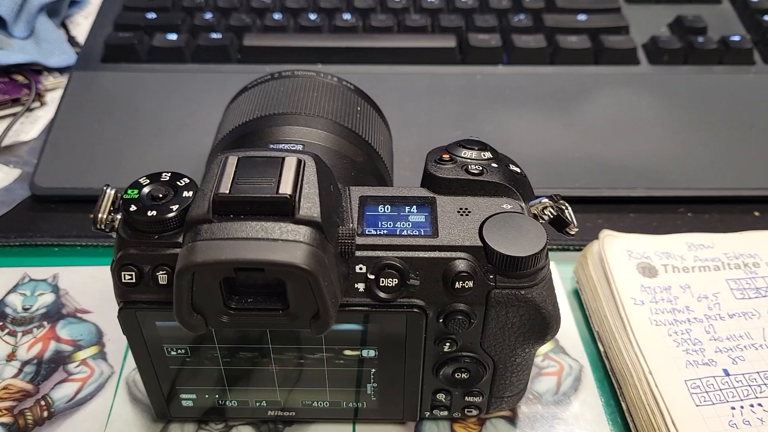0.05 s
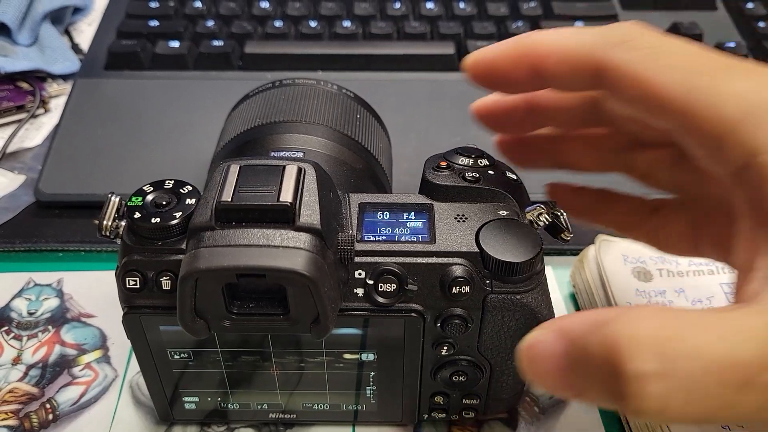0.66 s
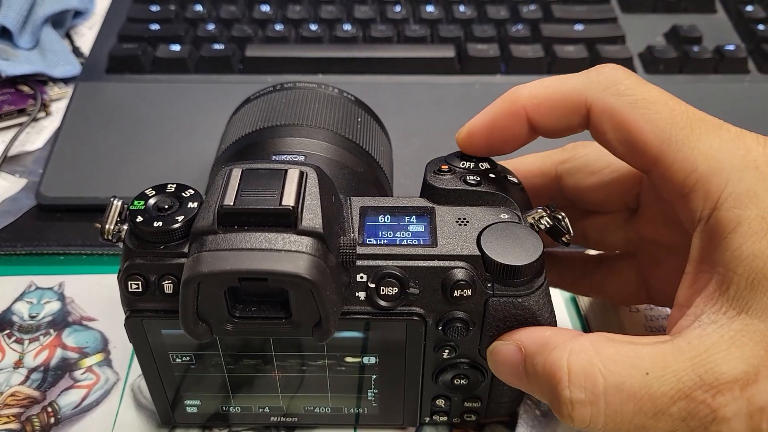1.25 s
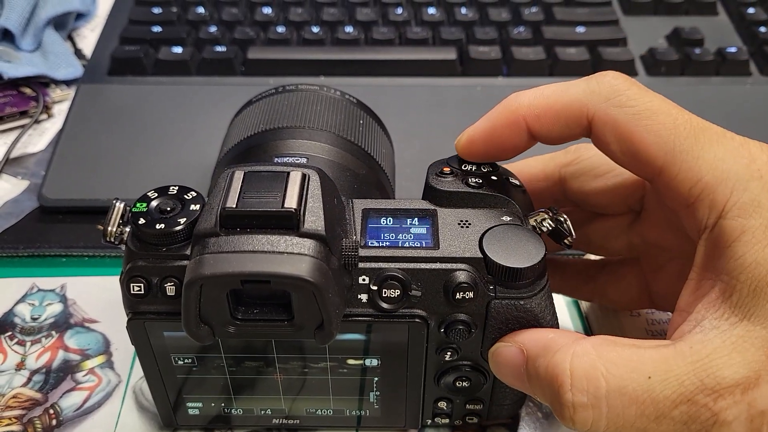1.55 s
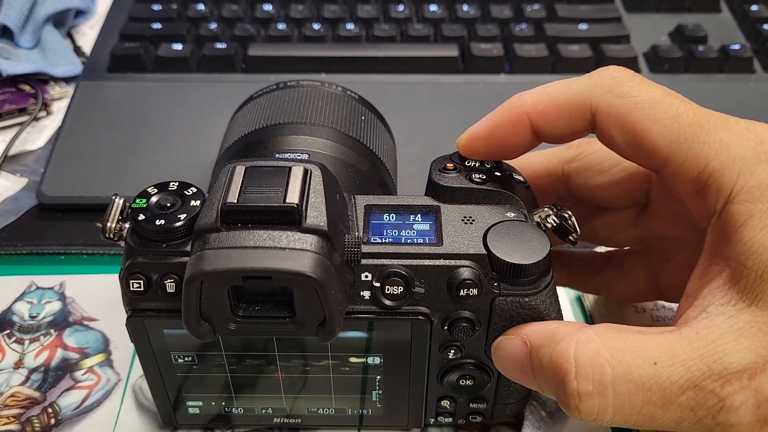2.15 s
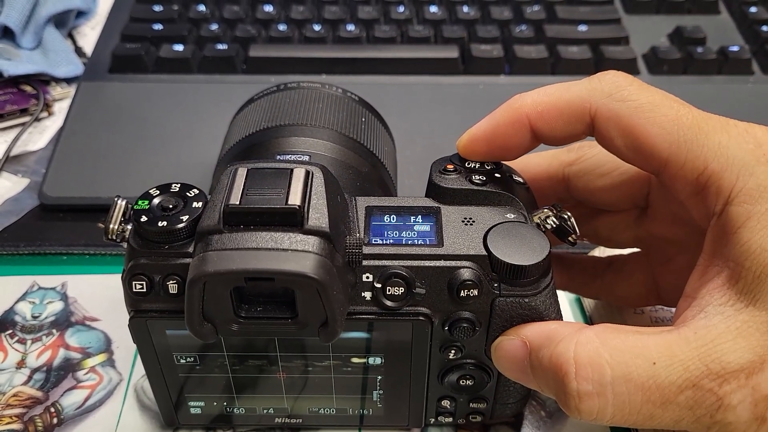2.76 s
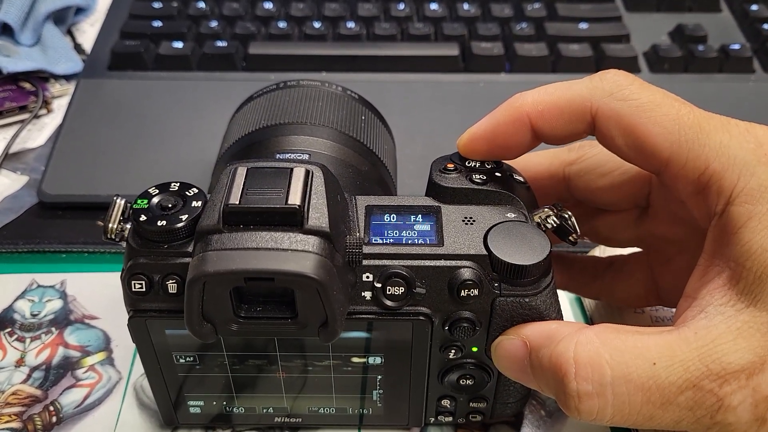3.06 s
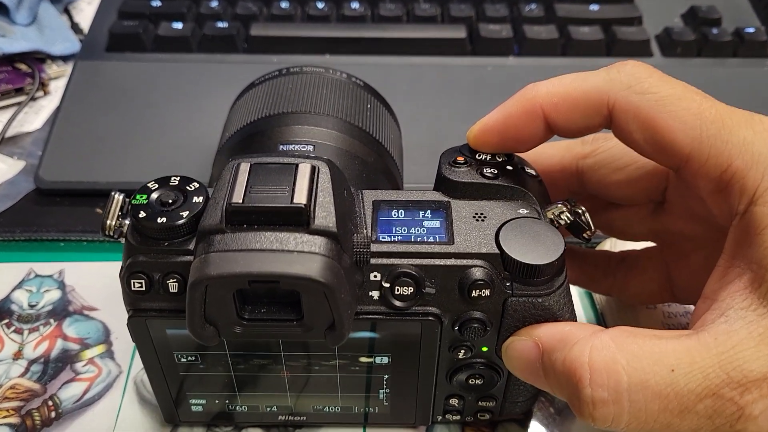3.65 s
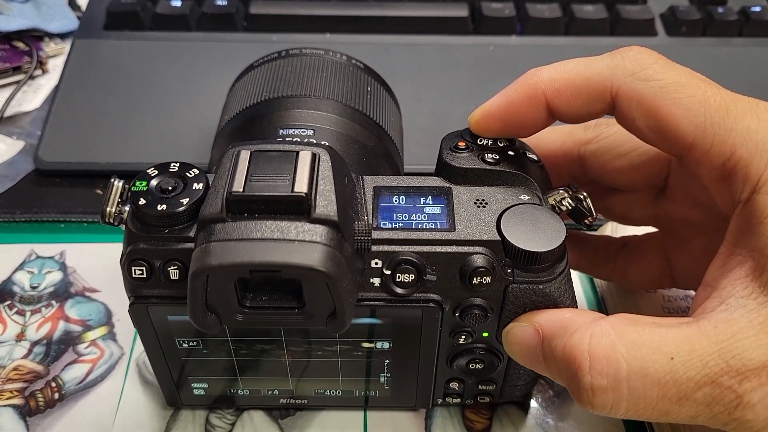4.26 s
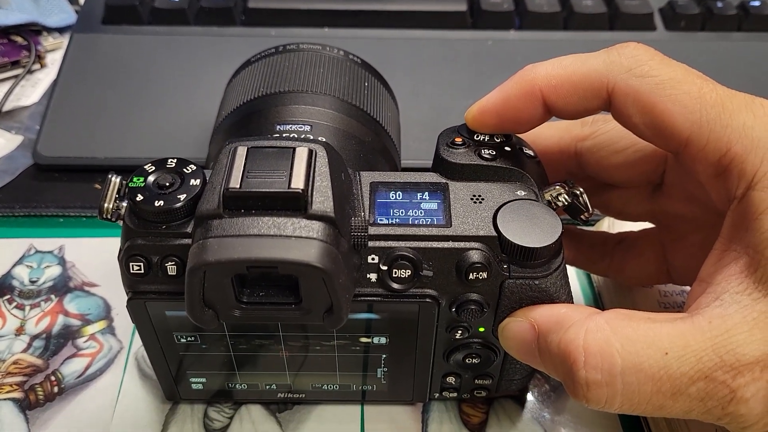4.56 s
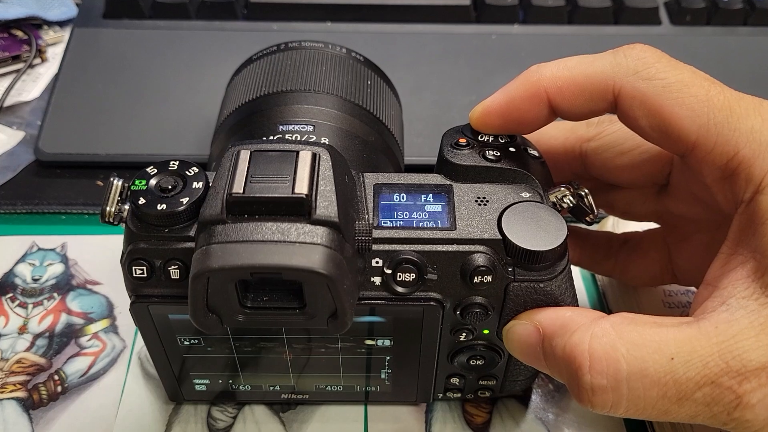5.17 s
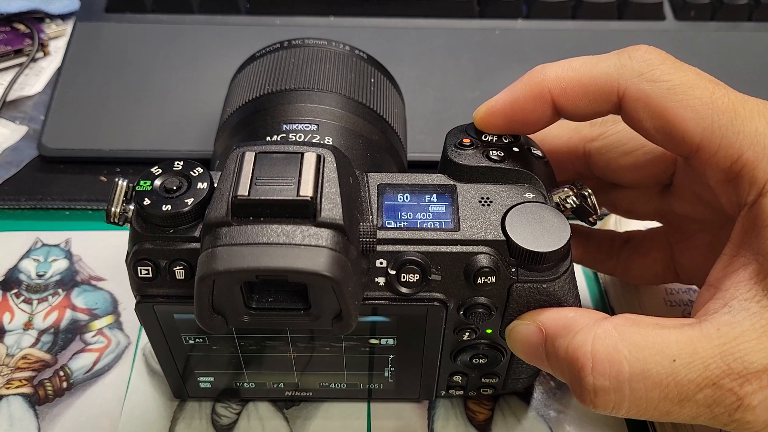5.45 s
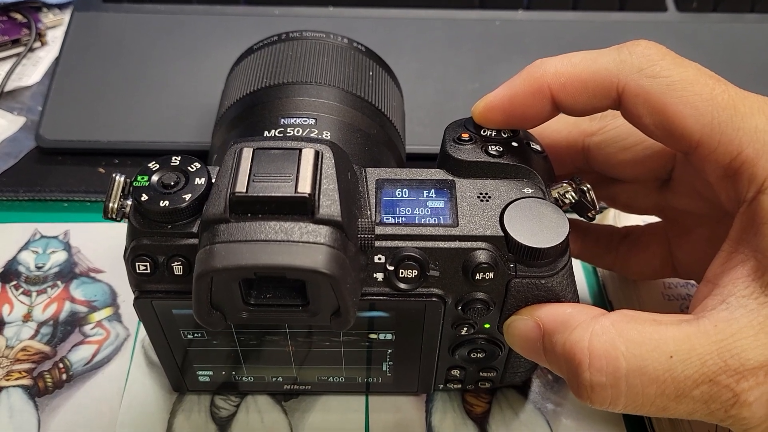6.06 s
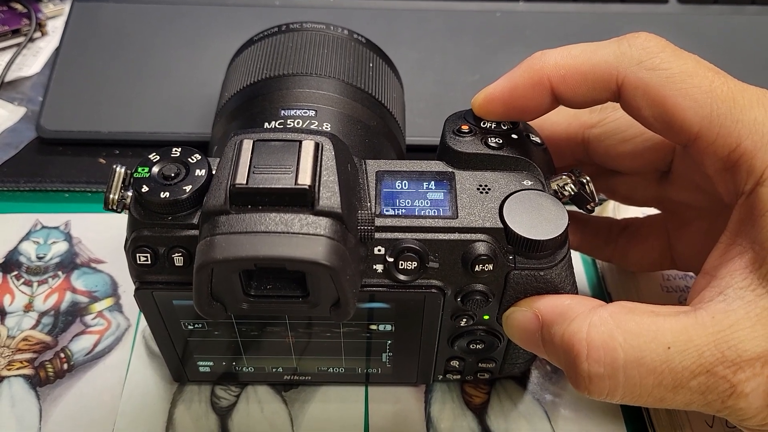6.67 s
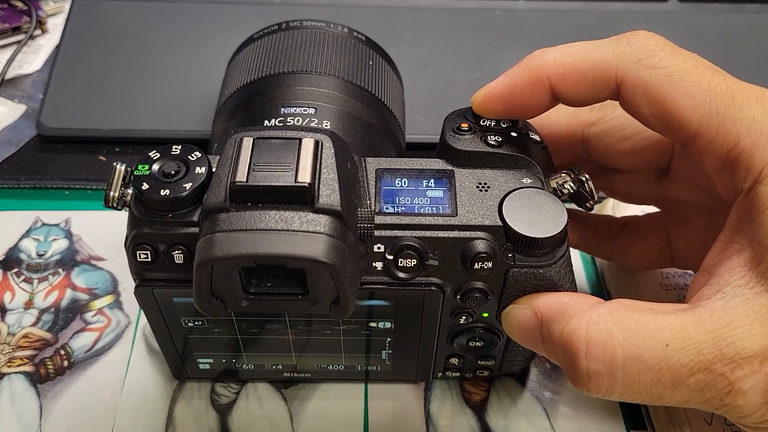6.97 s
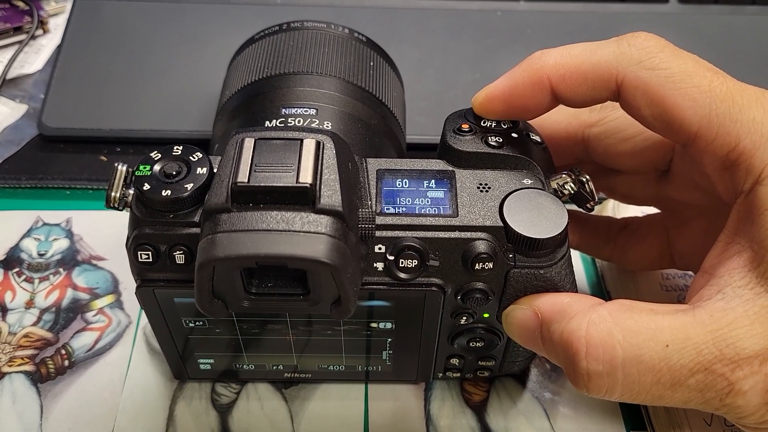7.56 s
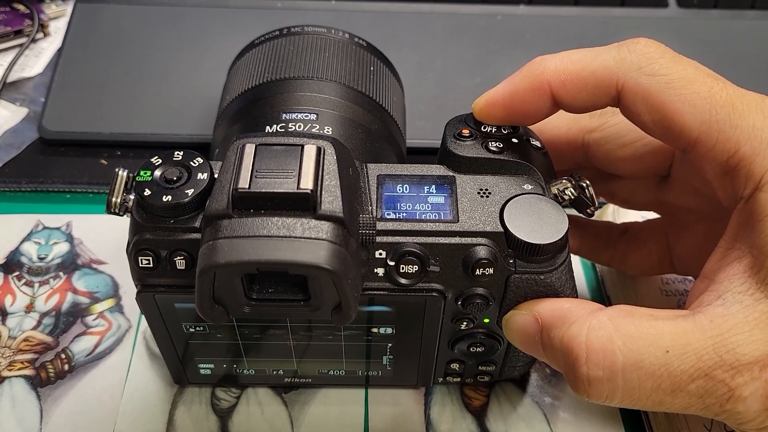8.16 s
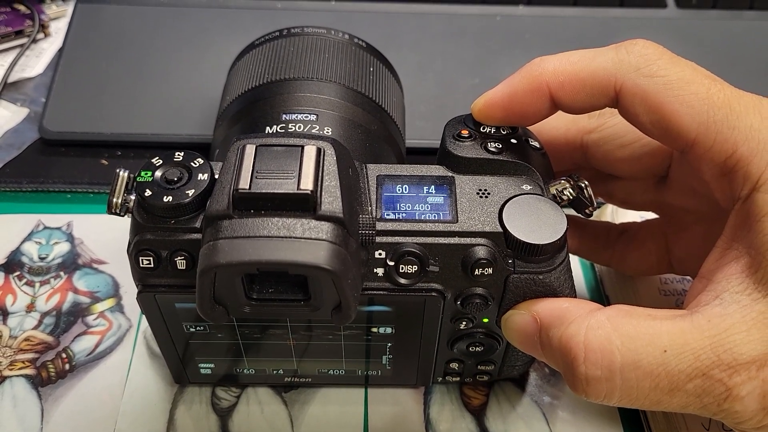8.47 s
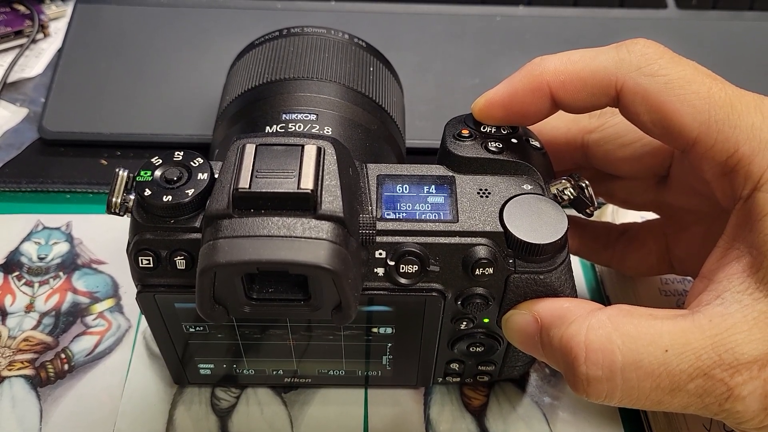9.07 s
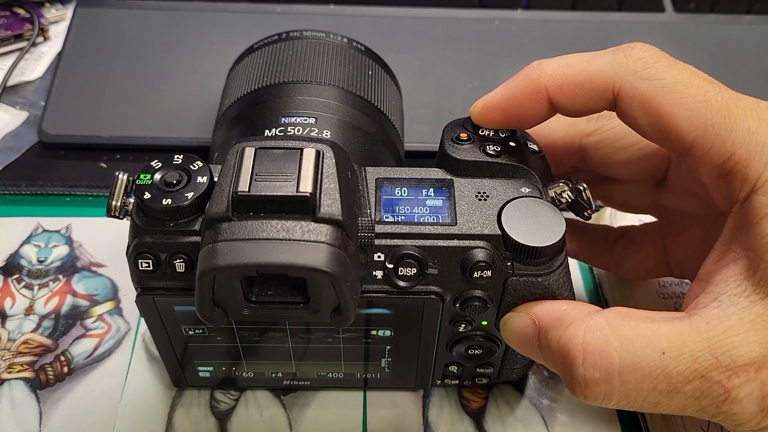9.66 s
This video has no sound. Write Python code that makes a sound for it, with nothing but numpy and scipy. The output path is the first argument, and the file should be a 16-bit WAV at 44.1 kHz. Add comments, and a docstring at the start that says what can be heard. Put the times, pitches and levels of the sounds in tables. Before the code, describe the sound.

Close up in a quiet room, soft hiss and a few muffled hand bumps lead into a camera shutter snapping rapidly, about eight shots a second. Each shot is a crisp click, a brief winding rasp and a second click, lightly thumping the desk below. After some four seconds the burst gives way to about ten slower, halting shots, their closing and opening clacks clearly apart, over a faint rumble from the gripping hand.

```python
"""A mirrorless camera's shutter fires a burst at eight frames a second, then single shots, on a desk.
In each shot a latch trips and a curtain slams shut, the motor winds it back, and a second latch and
slam reopen the shutter. The blows ring the camera body and thump the desk, close to a phone's two
microphones in a quiet room. The hand adds soft bumps, ticks and a low rumble, and the electronics
whine faintly after the burst. A soft, steady hiss lies underneath."""
import sys
import numpy as np
from scipy import signal
from scipy.fft import rfft, irfft
from scipy.io import wavfile
from scipy.ndimage import uniform_filter1d

SR = 44100
rng = np.random.default_rng(int(sys.argv[2]) if len(sys.argv) > 2 else 0)


def bounce(signal):
    """Save signal as a 16-bit WAV file at the path given by the first command-line argument."""
    frames = np.transpose(np.atleast_2d(signal))
    limited = np.clip(frames, -1, 1)
    pcm = np.round(limited * 32767).astype(np.int16)
    wavfile.write(sys.argv[1], SR, pcm)


N = 437472
SIZE = 8192  # samples in one short sound
T, HZ = np.arange(SIZE) / SR, np.fft.rfftfreq(SIZE, 1 / SR)
TIME = np.arange(N) / SR
TOP_HZ = 16100


def shutter():
    """Latch, closing slam, winding, then latch and opening slam. Returns close sound and room send."""
    # camera body resonances: pitch_hz, width_hz, closing_lift_db, opening_lift_db
    body_modes = [(746, 100, 11.5, 20.5), (876, 134, 12, 11.5), (1008, 130, 1.5, 4.5),
                  (1148, 188, 2.5, 19.5), (1300, 115, 4.5, 15.5), (1472, 197, 3, 13.5),
                  (1620, 156, -2, 10.5), (1784, 58, -3, 13.5), (1807, 37, 1, 12), (2062, 123, 5, 8),
                  (2125, 170, -3, -0.5), (2600, 150, 3.5, -3), (3239, 106, 3.5, 17.5),
                  (3240, 370, 4.5, -3.5), (3836, 176, 5, 13), (4410, 400, 3, 0.5), (4810, 620, 3, 6.5),
                  (5570, 880, 2, 7.5), (6290, 1120, 5.5, 7), (8070, 720, 2.5, 13), (8570, 285, 7.5, 7),
                  (9530, 960, 2.5, 11), (10100, 210, 1, 15), (12840, 2500, 7.5, 9.5)]
    # force spectra of the four contacts: freq_hz, level_db
    latch_eq = [(300, 3), (550, -13), (800, -6.5), (1300, -12.5), (2200, -1.5), (4000, -9.5), (7000, -19),
                (11000, -23.5), (15500, -21.5)]
    close_eq = [(300, -43), (550, -22), (800, -11), (1300, 4), (2200, 3.5), (4000, -5), (7000, -12),
                (11000, -11.5), (15500, -18.5)]
    open_eq = [(300, -20.5), (550, -8), (800, -9), (1300, -10.5), (2200, -3.5), (4000, 3.5), (7000, -11.5),
               (11000, -10.5), (15500, -15.5)]
    gear_eq = [(300, -26.5), (550, -4.5), (800, -4), (1300, 5), (2400, 0), (4000, -2), (7000, -9),
               (11000, -15), (15500, -21)]
    close_s, close_db, open_s, open_db, treble = shots()
    closing, opening = sum(np.outer(lifts, 1 / (1 + (2 * (HZ - hz) / width) ** 2))
                           for hz, width, *lifts in body_modes)
    travel_s = .0064  # the curtain's flight from latch to stop
    latch = shape([(.001, 1), (.0024, .8), (.0045, .45), (.007, .4)])
    shut = shape([(.0003, .97), (.0012, .79), (.0028, .4), (.005, .3), (.01, .08)])  # blade after blade
    snap = shape([(.0003, 1), (.0014, .89), (.0028, .45), (.005, .29), (.009, .1), (.016, .058)])
    shut_push = shape([(.002, .6), (.01, .6), (.016, .99), (.025, .5), (.036, .5), (.05, .1853)])
    open_push = shape([(.003, .6), (.01, .9), (.02, .3)])
    latch_colour = curve(latch_eq, HZ)
    out = blows(close_s - travel_s, close_db - 11.5, treble, latch,
                latch_colour + (closing + opening) / 2, scatter=.8)
    out += blows(close_s, close_db - 4.5, treble, shut, curve(close_eq, HZ) + closing, scatter=.66)
    out += winding(close_s, close_db - 3, treble, curve(gear_eq, HZ) + closing, grit_db=2)
    out += blows(open_s - travel_s, open_db - 11, treble, latch, latch_colour + opening, scatter=.64)
    out += blows(open_s, open_db - 2.5, treble, snap, curve(open_eq, HZ) + .84 * opening, scatter=.63)
    thump = recoil(close_s, close_db / 2 - 12.5, shut_push)
    thump += recoil(open_s - travel_s, open_db / 2 - 17, open_push)
    return out[:2] + thump, out[2:] + thump[:1]


def shots():
    """Cue times, levels and brightness: an even burst on the camera's clock, then slower shots."""
    # with the buffer full, each shot waits its turn: close_s, open_s
    slow_shots = [(6.12, 6.284), (6.9937, 7.143), (7.2957, 7.4473), (7.5945, 7.7428), (7.8949, 8.0667),
                  (8.2287, 8.3739), (8.5287, 8.6804), (8.964, 9.1085), (9.5913, 9.6688), (9.713, 9.8782)]
    # brightness of the shutter: time_s, treble_db
    brightness = [(1.976, .5), (2.098, 2.5), (2.22, 3.5), (2.342, -2), (2.75, 0.5), (4.1, 2), (6.05, 0.5),
                  (7.0, -3), (9.7, -4)]
    frames, burst_s, frame_s, shut_s, jitter_s = 34, 1.976, .12188, .0782, .0002
    settle_s, slow_db, scatter_db = .3, -.09, .3
    burst = burst_s + frame_s * np.arange(frames) + jitter_s * rng.standard_normal(frames)
    close_s, open_s = np.vstack([np.transpose([burst, burst + shut_s]), slow_shots]).T
    accent = np.exp(-(close_s - burst_s) / settle_s)  # the first few slams are louder
    vary_db = slow_db * (close_s > burst[-1]) + scatter_db * rng.standard_normal((len(close_s), 2)).T
    close_db = -1.32 + 3.9 * accent + vary_db[0]
    open_db = -1.55 + 3 * accent + vary_db[1]
    return close_s, close_db, open_s, open_db, np.interp(close_s, *np.transpose(brightness))


def blows(times, levels_db, trebles_db, envelope, colour, scatter):
    """Clicks of a latch or curtain: the same parts meet in nearly the same way on every shot."""
    usual = stereo_chatter(envelope, likeness=.4)
    out = np.zeros((3, N))
    for s, db, treble in zip(times, levels_db, trebles_db):
        force = unit(usual + scatter * stereo_chatter(envelope, likeness=.7))
        add(out, s, amp(db) * camera_body(force, colour, treble))
    return out


def winding(times, levels_db, trebles_db, colour, grit_db):
    """Gears rattle up to speed and run down, never twice alike; the cam knocks on the way."""
    # cam knocks against the gear noise: after_closing_s, level_db
    cam = [(0.0138, 2), (0.0186, 0.5), (.0295, -3), (0.0367, -11.5)]
    out = np.zeros((3, N))
    run = shape([(.003, .1), (.009, .65), (.016, .97), (.023, .65), (.038, .38), (.047, .1)])
    for s, db, treble in zip(times, levels_db, trebles_db):
        teeth = amp(grit_db * np.repeat(rng.standard_normal(SIZE // 32), 32))
        slip = rng.standard_normal((len(cam), 2))
        knock_power = sum((amp(lift + louder) * fall(at + .00057 * later, .0014)) ** 2
                          for (at, lift), (later, louder) in zip(cam, slip))
        force = stereo_chatter(np.sqrt((run * teeth) ** 2 + knock_power), likeness=.34)
        add(out, s, amp(db) * camera_body(force, colour, treble))
    return out


def camera_body(force, colour, treble_db):
    """A force rings the body: left, right, and the sound sent all round, whose resonances blur."""
    colour = colour + treble_db * HZ ** 4 / (HZ ** 4 + 7000 ** 4)  # high shelf
    near = ring(force, colour, lag_s=.00013)
    around = ring(force, uniform_filter1d(colour, size=190), lag_s=0)[:1]
    return np.vstack([near, around])


def recoil(times, levels_db, envelope):
    """The moving masses thump the desk almost alike on each shot."""
    # response of the desk: freq_hz, gain_db
    desk_eq = [(35, -10), (64, 3), (88, -5), (115, 1.5), (140, -12), (175, -2), (245, -2.5), (290, -19),
               (335, -6.5), (360, -14), (390, -5.5), (440, -15.5), (750, -13.5), (1500, -56)]
    out = np.zeros((2, N))
    usual = whiten(chatter(envelope, passes=30))
    for s, db in zip(times, levels_db):
        force = usual + stereo_chatter(envelope, likeness=.94) / 2
        add(out, s, amp(db) * ring(force, curve(desk_eq, HZ), lag_s=0))
    return out


def chatter(envelope, passes=4):
    """A run of tiny impacts under an envelope, favouring no pitch."""
    x = rng.standard_normal(SIZE) * envelope
    for _ in range(passes):
        x = whiten(x)
        x = x * envelope / np.sqrt(np.abs(uniform_filter1d(x ** 2, size=45)) + 1e-12)
    return unit(x)


def stereo_chatter(envelope, likeness):
    """Chatter as two microphones get it: partly the same, partly by other paths."""
    left = chatter(envelope)
    return np.array([left, likeness * left + np.sqrt(1 - likeness ** 2) * chatter(envelope)])


def ring(force, colour, lag_s):
    """A force rings with a tone colour given in dB and reaches the right microphone lag_s later."""
    # stereo balance at the phone: freq_hz, left_minus_right_db
    balance = [(60, -3), (110, 2), (200, -2), (380, -11.5), (700, 0.5), (1290, 5.5), (2380, 8), (4400, 3.5),
               (8120, 6), (15000, 10.5)]
    cepstrum = irfft(np.log(amp(colour)))[:SIZE // 2]
    cepstrum[1:] *= 2  # minimum phase: the ringing follows the hit
    impulse = unit(irfft(np.exp(rfft(cepstrum, SIZE))))
    side = amp(curve(balance, HZ) / 2)
    pan = np.array([side, np.exp(-2j * np.pi * HZ * lag_s) / side])
    return irfft(rfft(force) * rfft(impulse) * pan)


def room(send):
    """A small furnished room: a short diffuse tail, octave by octave."""
    # reverb tone: freq_hz, level_db
    reverb_eq = [(150, 2.5), (600, -10.5), (1400, -3.5), (3600, -7.5), (7000, -10.5), (15000, -14.5)]
    # reverb length: freq_hz, t60_s
    reverb_time = [(300, 0.2), (1300, 0.17), (4000, 0.21), (14000, 0.32)]
    tail = np.zeros((2, SIZE * 2))
    t = np.arange(SIZE * 2) / SR
    attack = np.clip(t / .008, 0, 1) ** 2
    for hz in 125 * 2 ** np.arange(8):
        edges_hz = [hz / np.sqrt(2), min(hz * np.sqrt(2), TOP_HZ)]
        band = signal.butter(3, edges_hz, "band", fs=SR, output="sos")
        decay = unit(attack * np.exp(-np.log(1000) * t / curve(reverb_time, hz)))
        tail += amp(curve(reverb_eq, hz)) * signal.sosfilt(band, rng.standard_normal(tail.shape) * decay)
    return signal.fftconvolve(send, tail, axes=1)[:, :N]


def hand():
    """Dull bumps, small finger ticks and the rumble of handling."""
    # soft bumps of the hand: start_s, level_db, pitch_hz
    bumps = [(0.564, -33.5, 85), (.655, -34.5, 61.6), (.712, -45, 60), (.895, -40.5, 65), (4.41, -47, 45.7),
             (8.055, -40, 59), (8.681, -44, 72)]
    # finger ticks and brushes on the grip: start_s, level_db, decay_s
    ticks = [(0.749, -70.5, 0.082), (.905, -73, 0.13), (.968, -57, .004), (.99, -77, .12),
             (1.68, -69, .004), (1.899, -69, 0.0027)]
    # tone of the ticks and of the rumble: freq_hz, level_db
    finger_eq = [(1500, -20), (4000, -3), (5700, -3), (7600, 3), (9500, -13), (13000, -13), (16000, -14)]
    rumble_eq = [(15, -8.5), (27, 2.5), (37, -4.5), (50, -2.5), (66, -7.5), (90, -6.5), (118, -6.5),
                 (160, -45), (400, -64.5)]
    # fader ride of the rumble: time_s, level_db
    rumble_ride = [(0, -70), (.47, -73), (.55, -52), (1.3, -53.5), (1.9, -61.5), (4.4, -59), (6, -61),
                   (7.5, -52), (9.9, -55)]
    out = np.zeros((2, N))
    swell = (T / .013) ** 2 * np.exp(2 - 2 * T / .013)  # soft skin pushes slowly
    for s, db, hz in bumps:
        add(out, s, amp(db) * swell * np.sin(2 * np.pi * hz * T))
    for s, db, decay_s in ticks:
        touch = rng.standard_normal((2, SIZE)) * fall(0, decay_s)
        add(out, s, amp(db) * ring(touch, curve(finger_eq, HZ), lag_s=0))
    rumble = noise(rumble_eq) * np.array([[.75], [1.2]])  # leans right
    rumble += .5 * np.array([noise(rumble_eq), noise(rumble_eq)])
    return out + amp(np.interp(TIME, *np.transpose(rumble_ride))) * rumble


def whine():
    """A thin, unsteady whine of the electronics while the camera empties its buffer."""
    start_s, pitch_hz, width_hz, level_db = 6.28, 9520, 280, -97
    detune = (np.fft.rfftfreq(N, 1 / SR) - pitch_hz) / width_hz
    band = irfft(rfft(rng.standard_normal((2, N))) * np.exp(-2 * detune ** 2), N)
    return amp(level_db) * (TIME > start_s) * band / band.std()


def hiss():
    """Steady, wide background hiss with a dip near 10 kHz."""
    # hiss common to both sides (mid) and opposed (side): freq_hz, level_db
    mid_eq = [(70, -23), (120, -3), (165, -8), (210, -1), (306, -9), (560, -11), (770, -13), (1650, -25),
              (2700, -32.5), (4400, -44), (7500, -47), (10000, -62), (12000, -51.5), (15500, -50)]
    side_eq = [(70, -32), (120, -19.5), (210, -15.5), (500, -6.5), (700, -9), (1200, -15), (1700, -21),
               (2700, -32), (4400, -43), (7500, -48), (10000, -58), (15500, -52.5)]
    return amp(-56.5) * noise(mid_eq) + amp(-57.5) * noise(side_eq) * np.array([[1], [-1]])


def amp(db):
    """Decibels to gain."""
    return 10 ** (np.asarray(db) / 20)


def curve(points, hz):
    """Straight lines between points on a log-frequency axis."""
    f, value = np.transpose(points)
    return np.interp(np.log(hz + 1e-9), np.log(f), value)


def unit(x):
    """Scale to an energy of one."""
    return x / np.sqrt(np.sum(x ** 2, axis=-1, keepdims=True))


def whiten(x):
    """Give a force equal strength at all frequencies."""
    return irfft(np.exp(1j * np.angle(rfft(x))))


def shape(points):
    """Envelope from silence through (time_s, strength) points and back to silence."""
    s, strength = np.transpose(points)
    return np.interp(T, np.r_[0, s, s[-1] * 1.25], np.r_[0, strength, 0])


def fall(start_s, decay_s):
    """Envelope that jumps up and dies away."""
    return (T >= start_s) * np.exp(-np.maximum(T - start_s, 0) / decay_s)


def add(out, start_s, x):
    """Mix a short sound in and fade its end."""
    i = int(start_s * SR)
    fade = np.sin(np.pi / 2 * np.clip(2 * (1 - T / T[-1]), 0, 1)) ** 2
    out[:, i:i + SIZE] += (x * fade)[..., :max(N - i, 0)]


def noise(eq):
    """Steady noise of the given colour, rms 1."""
    x = irfft(rfft(rng.standard_normal(N)) * amp(curve(eq, np.fft.rfftfreq(N, 1 / SR))), N)
    return x / x.std()


def scene():
    """The shutter and its room reverb over the whine, the hand and the hiss."""
    near, around = shutter()
    return near + amp(-5.5) * room(around) + whine() + hand() + hiss()


def record(dry):
    """The phone's input fades in after a moment; a steep low-pass cuts the top."""
    start_s, fade_s = .2, .039
    fade_in = np.clip((TIME - start_s) / fade_s, 0, 1)
    return signal.sosfilt(signal.ellip(8, .2, 70, TOP_HZ, fs=SR, output="sos"), dry * fade_in)


dry = scene()
out = record(dry)
bounce(out)
```